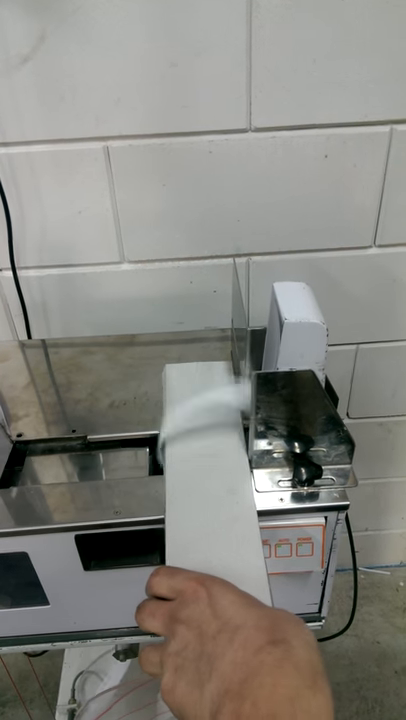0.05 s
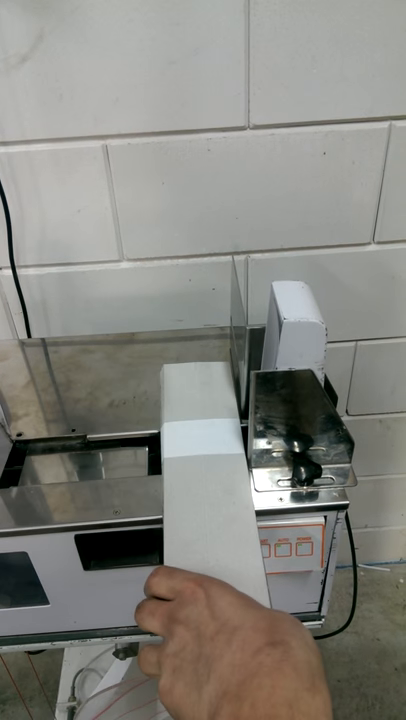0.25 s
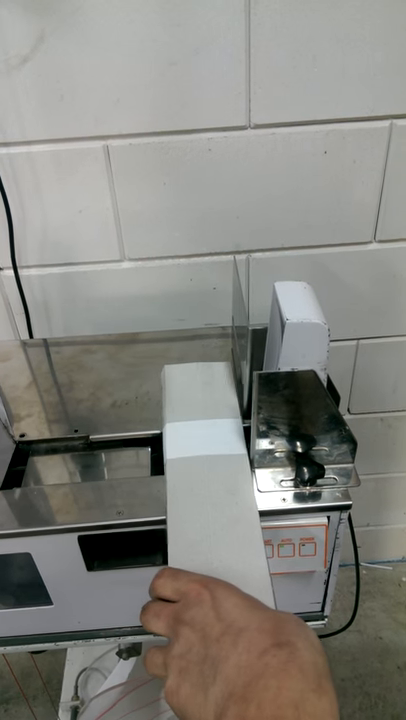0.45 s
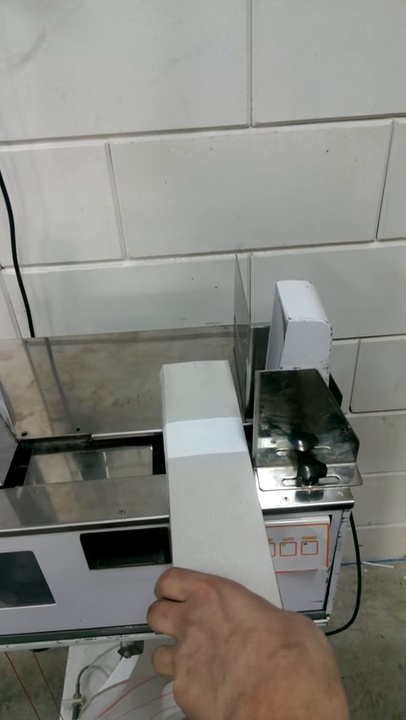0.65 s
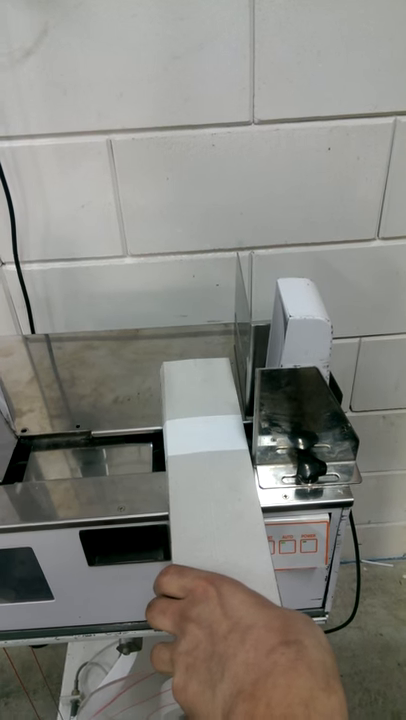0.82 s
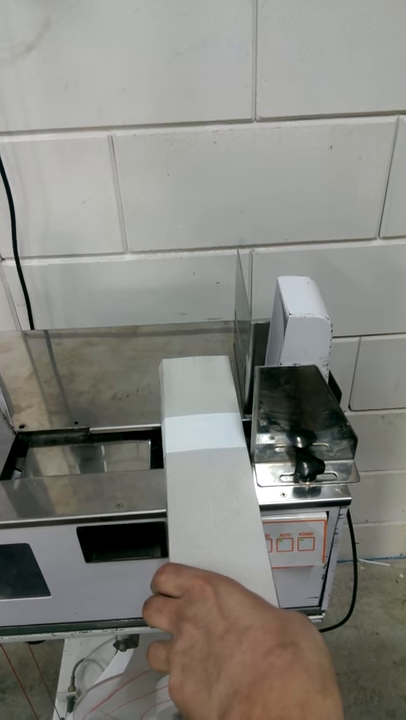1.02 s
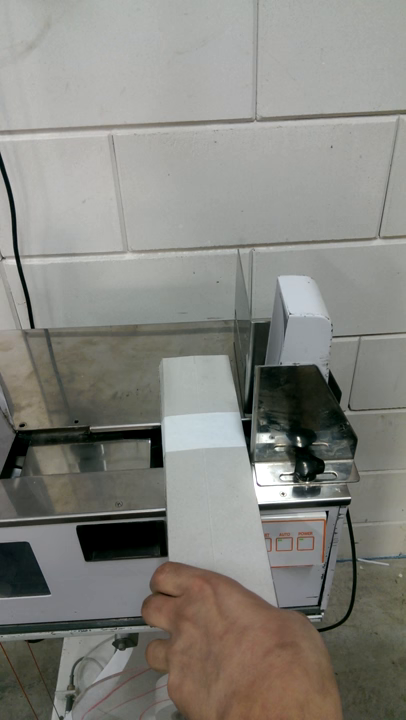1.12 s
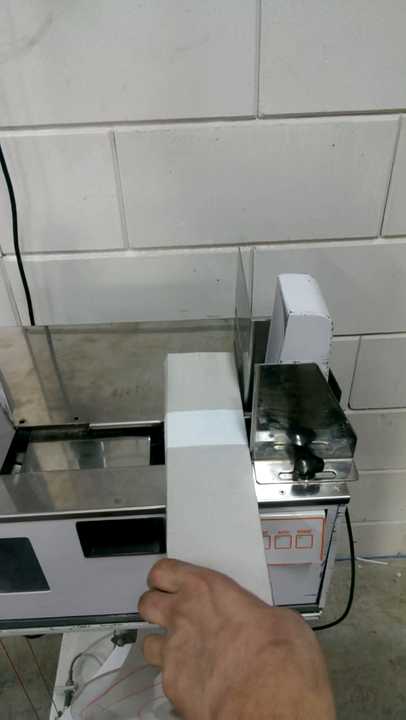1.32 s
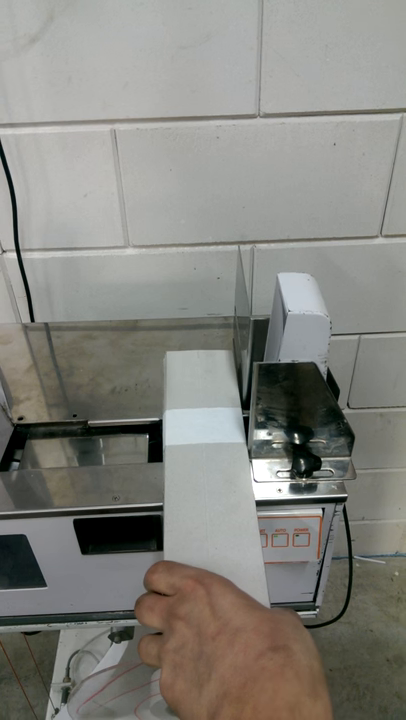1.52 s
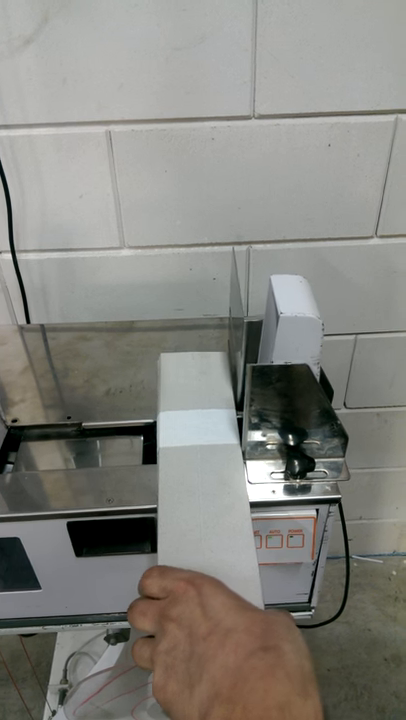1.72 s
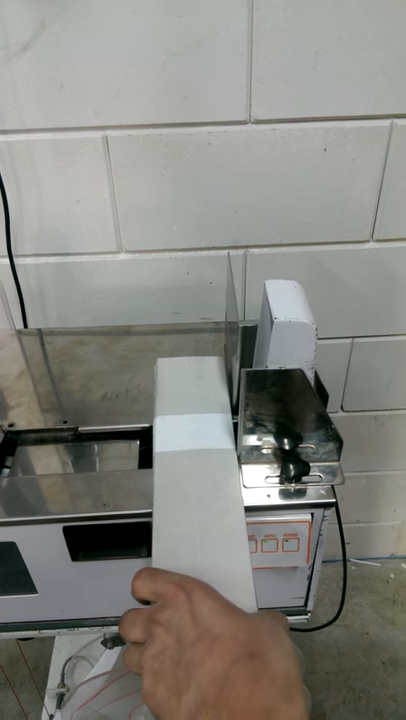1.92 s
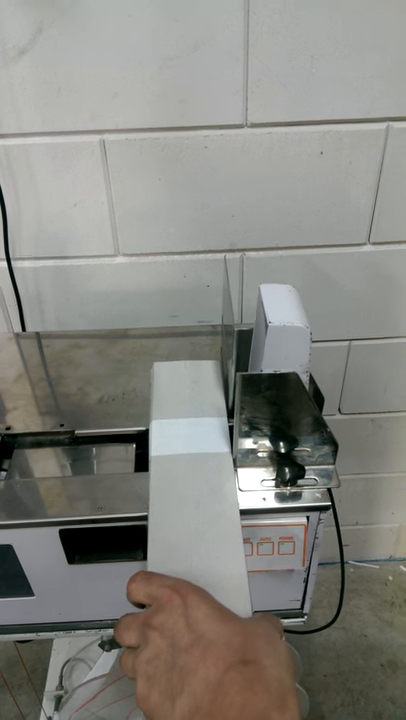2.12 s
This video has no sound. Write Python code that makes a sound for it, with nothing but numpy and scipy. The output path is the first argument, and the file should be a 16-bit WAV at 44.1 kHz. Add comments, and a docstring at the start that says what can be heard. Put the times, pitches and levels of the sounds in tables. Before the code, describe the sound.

A small banding machine whirs and whines close by as a paper band hisses and slaps around a box at 0.25 seconds. Rollers buzz from 0.3 to 0.9 seconds, with a sharp click near 0.7. Clamps knock at 1.1 and 1.25 seconds, and the cutter clacks loudest near 1.5. The motor dies away by 1.8 seconds, leaving faint metal ringing over a low hum in a hard-walled room.

```python
"""A tabletop banding machine wraps a paper band round a box, close by in a hard-walled room.
First the drive whirs and the feed motor whines while the band slides in and whips shut on the box.
Then rollers buzz as they pull it tight, the frame drones, and the rollers labour to a stop.
Next the clamps knock and the cutter strikes. Last, the drive shuts off,
leaving the ring of the frame over a low room hum."""
import sys
import numpy as np
from scipy import signal
from scipy.fft import rfft, irfft
from scipy.io import wavfile

SR = 44100
rng = np.random.default_rng(int(sys.argv[2]) if len(sys.argv) > 2 else 0)


def master_out(mix):
    """Clip the mix to full scale and print it as 16-bit PCM to the path in sys.argv[1]."""
    frames = np.transpose(np.atleast_2d(mix))
    ceiling = np.clip(frames, -1, 1)
    pcm = np.round(ceiling * 32767).astype(np.int16)
    wavfile.write(sys.argv[1], SR, pcm)


N = 94815
TIME = np.arange(N) / SR
FREQS = np.arange(N // 2 + 1) * SR / N


def undb(db):
    """Turn decibels into a gain."""
    return 10 ** (np.asarray(db) / 20)

def curve(rows):
    """Join (seconds, value) rows with straight lines."""
    return np.interp(TIME, *np.array(rows).T)

def fader(rows):
    """A gain that follows (seconds, dB) rows, silent after the last."""
    return undb(curve(rows)) * (TIME <= rows[-1][0])

def strike(start, rise, fade):
    """A straight rise, then a fall of 60 dB every `fade` seconds: the fade time."""
    age = TIME - start
    return np.clip(age / rise, 0, 1) * np.exp(-np.log(1000) * np.maximum(age - rise, 0) / fade)

def at_hz(hz, rows, column=1):
    """Look up a table by frequency, on a log scale."""
    rows = np.array(rows)
    return np.interp(np.log(hz + 1), np.log(rows[:, 0]), rows[:, column])

def unit(x):
    """Scale to an average (rms) level of 1."""
    return x / np.sqrt(np.mean(x ** 2))

def shaped(x, gain):
    """Apply a gain to each frequency, then scale to level 1."""
    return unit(irfft(rfft(x) * gain, N))

def noise():
    """Separate white noise for left and right."""
    return rng.standard_normal((2, N))

def wobble(hz):
    """A random wander of size 1, mostly slower than hz."""
    return shaped(rng.standard_normal(N), 1 / (1 + (FREQS / hz) ** 4))

def wavering_phase(pitch, jitter, hz):
    """The phase of a pitch that strays by the fraction `jitter`, mostly slower than hz."""
    return 2 * np.pi * np.cumsum(pitch * (1 + jitter * wobble(hz))) / SR

def colour(rows):
    """Gains from (Hz, dB) rows, falling steeply below the first."""
    return undb(at_hz(FREQS, rows)) * np.minimum(FREQS / rows[0][0], 1) ** 2

def peak(hz, width):
    """A bump of height 1 around one frequency."""
    return 1 / (1 + ((FREQS - hz) / width * 2) ** 2)

def resonances(rows):
    """Gains from (Hz, width, dB) peaks."""
    return sum(undb(db) / np.sqrt(width) * peak(hz, width) for hz, width, db in rows)

# The centres of six frequency ranges, bass to treble, in Hz.
RANGE_HZ = (250, 750, 1550, 2800, 5500, 12000)
def frequency_range(index, low_cut_hz=176):
    """Gains for one of the overlapping ranges; a small machine gives little deep bass."""
    share = np.interp(np.log(FREQS + 1), np.log(RANGE_HZ), np.arange(len(RANGE_HZ)) == index)
    return np.sqrt(share) / (1 + (low_cut_hz / (FREQS + 1)) ** 6)

# Each row: frequency in Hz, how alike the sides are (0-1), left over right in dB, left lead in radians.
STEREO = [(100, 0.88, 2.5, 0.17), (255, 0.94, 5, 0), (735, 0.28, 2, -0.37), (1700, 0, -0.5, -1.65),
          (3220, 0.38, -5.5, -0.55), (8150, 0.74, -8, -2), (11800, 0.9, -14, -1.5)]
def sides(hz):
    """The machine's gain and phase shift on the left and on the right."""
    half = undb(at_hz(hz, STEREO, column=2) / 2) * np.exp(.5j * at_hz(hz, STEREO, column=3))
    return np.array([half, 1 / half]).reshape(2, -1)

def stereo(x, gain, placed=True):
    """Filter and blend two signals: alike in the bass and, if placed, with the treble to the right."""
    a, b = rfft(shaped(x, gain))
    alike = np.clip(at_hz(FREQS, STEREO), 0, 1)
    mid, side = a * np.sqrt((1 + alike) / 2), b * np.sqrt((1 - alike) / 2)
    return irfft(np.array([mid + side, mid - side]) * (sides(FREQS) if placed else 1), N)

def tone(phase, hz):
    """A pure tone near hz, placed between left and right."""
    return np.sqrt(2) * np.imag(sides(hz) * np.exp(1j * phase))


# The room's air. Each row: frequency in Hz, relative level in dB.
AIR_COLOUR = [(25, -6), (140, -14), (270, 1.5), (400, -8.5), (600, -3), (1200, -12), (2300, -10),
              (3300, -26), (6000, -36), (15500, -42.5)]
# The room's hum. Each row: frequency in Hz, width in Hz, relative level in dB.
HUM_PEAKS = [(263.2, 11, -6.5), (1523, 97, -7)]
def ambience(air_db=-49.5, hum_db=-53.5, lean_left_db=3.5):
    """The steady air and low hum of the room."""
    air = undb(air_db) * stereo(noise(), colour(AIR_COLOUR), placed=False)
    pan = undb(lean_left_db * np.array([[.5], [-.5]]))
    return air * pan + undb(hum_db) * stereo(noise(), resonances(HUM_PEAKS))

# The echo's fade time in seconds for each of the six ranges.
ECHO_FADES = (0.85, 0.85, 1, 1, 0.72, 0.5)
def wall_echo(x, level_db=-10.5):
    """Hard walls throw back a wash of sound that dies sooner in the treble."""
    tail = 0
    for k, fade in enumerate(ECHO_FADES):
        wash = irfft(rfft(noise()) * frequency_range(k), N)
        tail = tail + wash * strike(start=0.0055, rise=0.0031, fade=fade)
    tail = tail / np.sqrt(np.sum(tail ** 2) / 2)
    echo = undb(level_db) * signal.fftconvolve(x, tail, axes=1)[:, :N]
    return stereo(echo, 1, placed=False) * np.sqrt(np.mean(echo ** 2))

# The drive's whir. Each row: frequency in Hz, relative level in dB.
WHIR_COLOUR = [(71, -18), (120, -3.5), (265, -2), (509, -3.5), (598, -48), (995, 0), (1410, -15),
               (2870, -5), (8770, -25.5), (15500, -31.5)]
# The drive's resonances. Each row: frequency in Hz, width in Hz, relative level in dB.
WHINE_PEAKS = [(276, 8.4, -1), (379.3, 10, -7), (1930, 60, 5), (2062, 53, 3), (2850, 58, 8), (3224, 18, 1),
               (3770, 380, 3.5), (5140, 300, -2)]
# How hard the drive works. Each row: time in seconds, level in dB.
DRIVE_EFFORT = [(0, -37.5), (.12, -37), (.3, -35), (.85, -37.5), (1.0, -38.5), (1.22, -37), (1.45, -35.5),
                (1.53, -38), (1.63, -46.5), (1.82, -69)]
# The electric hum. Each row: time in seconds, level in dB.
MAINS_LEVEL = [(0, -74), (.17, -53), (.28, -53.5), (.7, -51.5), (1.0, -58.5), (1.45, -56), (1.6, -79.5)]
def drive(whir_db=-5, whine_db=-6, mains_hz=100):
    """The running drive whirs and whines over the hum of the mains."""
    whir = undb(whir_db) * stereo(noise(), colour(WHIR_COLOUR))
    whine = undb(whine_db) * stereo(noise(), resonances(WHINE_PEAKS))
    hum = tone(2 * np.pi * mains_hz * TIME, mains_hz)
    return (whir + whine) * fader(DRIVE_EFFORT) + hum * fader(MAINS_LEVEL)

# The feed motor's whine. Each row: time in seconds, level in dB.
MOTOR_LEVEL = [(0, -50), (.15, -44.5), (.3, -44), (.85, -50), (1.07, -50.5), (1.15, -70), (1.45, -70)]
def feed_motor(pitch_hz=977.5, flutter_db=2.5):
    """The feed motor's rough whine fades once the band is clamped."""
    phase = wavering_phase(pitch_hz, jitter=0.026, hz=70)
    return fader(MOTOR_LEVEL) * undb(flutter_db * wobble(hz=80.4)) * tone(phase, pitch_hz)

# The sliding band. Each row: time in seconds, level in dB.
SLIDE_LEVEL = [(0, -40.5), (.035, -34), (.085, -46.5), (.11, -40), (.165, -44.5), (.203, -37),
               (.218, -30.5), (.243, -28.5), (.262, -53), (.3, -70)]
# Its rustle. Each row: frequency in Hz, relative level in dB.
SLIDE_COLOUR = [(300, -0.5), (1200, 5), (3000, 4), (5000, 1), (7000, 3), (11500, -1), (15500, -11)]
def band_slide(clicks_per_s=1100, spread_db=8, crackle_db=-1.5):
    """The paper band hisses and crackles as it slides."""
    hits = rng.random(N) < clicks_per_s / SR
    clicks = hits * undb(spread_db * np.tanh(rng.standard_normal(N))) * np.sign(noise())
    rustle = stereo(noise() + undb(crackle_db) * unit(clicks), colour(SLIDE_COLOUR))
    return rustle * fader(SLIDE_LEVEL)

# The band's flicks. Each row: start in seconds, level in dB, rise and fade times in seconds.
FLICKS = [(0.21, -31.5, 0.00067, 0.034), (.2205, -31.5, 0.00074, 0.036), (.678, -37, 0.00065, 0.043),
          (0.695, -29.5, 0.0076, 0.1), (1.388, -33, 0.0081, 0.097)]
# Their brightness. Each row: frequency in Hz, relative level in dB.
FLICK_COLOUR = [(1500, -8), (4000, 6.5), (8000, -0.5), (11500, -1), (15500, -15)]
def band_flicks():
    """Each flick of the band is a short, sharp burst of hiss."""
    bursts = sum(undb(db) * strike(start, rise, fade) for start, db, rise, fade in FLICKS)
    return stereo(noise(), colour(FLICK_COLOUR)) * bursts

def band_whip(start_s=.243, top_hz=3200, fall_s=.018, level_db=-27):
    """The loop of band slaps shut on the box: a rough chirp that falls quickly."""
    pitch = top_hz * np.exp(-np.maximum(TIME - start_s, 0) / fall_s)
    phase = wavering_phase(pitch, jitter=0.072, hz=900)
    return undb(level_db) * strike(start_s, rise=0.0015, fade=0.043) * tone(phase, top_hz)

# The rollers' note. Each row: time in seconds, pitch in Hz.
ROLLER_PITCH = [(.28, 248.7), (.58, 246), (.68, 253.9), (.8, 255.4)]
# How hard they pull. Each row: time in seconds, level in dB.
ROLLER_LOAD = [(.28, -65), (.315, -35), (.4, -36), (.62, -36), (.74, -35), (.83, -34), (.87, -44),
               (.93, -93)]
# The tones in their buzz. Each row: multiple of the pitch, relative level in dB.
BUZZ_TONES = [(1, -7), (2, -8), (3, -3.5), (4, -3), (5, -12), (6, -10.5), (7, -14), (8, -7)]
# Their rasp. Each row: frequency in Hz, relative level in dB.
RASP_COLOUR = [(150, -12), (300, -4.5), (600, -4.5), (950, 0.5), (1350, -3), (2100, -6), (3000, -4.5),
               (4500, -12), (8000, -21), (15500, -37.5)]
DRONE_ON_S, DRONE_FULL_S, DRONE_OFF_S, DRONE_FADE_S = 0.62, 0.7, 0.846, 0.38
def rollers(rasp_db=3.5, flutter_db=2.57, drone_db=-30, buzz_dip_db=-2.5):
    """Rollers rasp and buzz on the band; as it comes tight, the frame drones at their pitch."""
    pitch, load = curve(ROLLER_PITCH), fader(ROLLER_LOAD)
    phase = wavering_phase(pitch, jitter=0.00597, hz=40)
    buzz = sum(undb(db + flutter_db * wobble(hz=82)) * tone(multiple * phase, multiple * pitch.mean())
               for multiple, db in BUZZ_TONES)
    pulsing = 1 + 0.059 * np.cos(phase)
    rasp = stereo(noise() * pulsing * undb(1.46 * wobble(hz=63)), colour(RASP_COLOUR))
    tight = np.clip((TIME - DRONE_ON_S) / (DRONE_FULL_S - DRONE_ON_S), 0, 1)
    release = np.exp(-np.log(1000) * np.maximum(TIME - DRONE_OFF_S, 0) / DRONE_FADE_S)
    drone = undb(drone_db) * tight * release * tone(phase, pitch.mean())
    tones = buzz * undb(buzz_dip_db * tight) * load + drone
    return undb(rasp_db) * rasp * load, tones

# Knocks of band, clamps and cutter. Each row: start in seconds, six levels in dB (one per range),
# how hard casing, frame and blade ring in dB, base rise time and fade time at 1000 Hz in seconds.
KNOCKS = [ (0.242, -31, -34, -29, -34, -35, -50, -51, -41, -62, 0.00076, 0.089),
          (0.6774, -36, -33, -26, -24.5, -26.5, -30.5, -54, -50, -66, 0.00084, 0.12),
          (.685, -33.5, -32, -29.5, -36, -36, -45, -48, -44, -54, 0.00091, 0.14),
          (1.079, -31.5, -28.5, -31, -33.5, -29, -41, -31, -40, -56, 0.00094, 0.12),
          (1.255, -28.5, -24, -24, -27.5, -27, -33, -24.5, -33.5, -43.5, 0.0026, 0.13),
          (1.292, -48, -50, -38, -34.5, -42, -49, -34, -52, -66, .006, 0.14),
          (1.391, -39, -59, -28.5, -45, -57, -63, -55, -66, -64, 0.0062, 0.094),
          (1.4607, -28.5, -19.5, -15, -16, -23.5, -31.5, -30.5, -29.5, -26, 0.00062, 0.086),
          (1.481, -28, -35, -22, -33.5, -43, -47, -38, -57, -37, .003, 0.18)]
# Panel resonances that colour the clatter. Each row: frequency in Hz, width in Hz, boost in dB.
PANEL_PEAKS = [(320, 73, -6), (736, 116, 6), (940, 240, 8.5), (1517, 110, 10), (2650, 1040, 5)]
def knocks(damping=0.28, bass_lag=0.057):
    """Each knock is a dense clatter whose bass comes later and lasts longer."""
    panels = undb(sum(db * peak(hz, width) for hz, width, db in PANEL_PEAKS))
    clatter = 0
    for k, hz in enumerate(RANGE_HZ):
        stretch = (1000 / hz) ** damping
        lag = bass_lag * RANGE_HZ[0] / hz
        blows = sum(undb(levels[k]) * strike(start, rise + lag * fade, stretch * fade)
                    for start, *levels, rise, fade in KNOCKS)
        clatter = clatter + stereo(noise(), frequency_range(k) * panels) * blows
    return clatter

# The notes of the hollow casing, the frame and the blade.
# Each row: pitch in Hz, relative level in dB, fade time in seconds.
CASING_NOTES = [(301.4, -9, 0.18), (659, -7.5, 0.15), (771, -4, 0.055), (850, -13, 0.029)]
FRAME_NOTES = [(168.2, -12, 0.61), (215, -9.5, 0.81), (273.9, -5.5, 0.8), (308.3, -1, 0.23),
               (383.2, -6, 0.3), (654.6, -5, 0.44), (759, 6, 0.068), (1180, -1, 0.14)]
BLADE_NOTES = [(1453, -9, .33), (1546, 14.5, 0.072), (1612, -10, 0.5), (1973, 0.5, 0.13), (2009, -1, 0.1),
               (2315, 0, 0.15), (2514, -18, 1), (2775, -7, 0.24), (2825, 0, 0.11)]
def ring(notes, column, rise_s):
    """Every knock sets a part ringing with a slight rattle, as hard as its column in KNOCKS says."""
    one_ring = sum(undb(db) * strike(0, rise_s, fade) * tone(wavering_phase(hz, .011, hz=39.7), hz)
                   for hz, db, fade in notes)
    ringing = np.zeros((2, N))
    for knock in KNOCKS:
        start = int(knock[0] * SR)
        ringing[:, start:] += undb(knock[column]) * one_ring[:, :N - start]
    return ringing


def scene(metal_to_walls_db=-3.5):
    """The machine and its ringing casing, frame and blade in the room."""
    rasp, roller_tones = rollers()
    casing = ring(CASING_NOTES, column=7, rise_s=0.0049)
    frame = ring(FRAME_NOTES, column=8, rise_s=0.0064)
    blade = ring(BLADE_NOTES, column=9, rise_s=0.0038)
    metal = frame + blade
    machine = drive() + rasp + band_slide() + band_flicks() + band_whip() + knocks() + casing
    echo = wall_echo(machine + undb(metal_to_walls_db) * metal)
    return machine + feed_motor() + roller_tones + metal + echo + ambience()

def record(dry):
    """Cut the treble above 15700 Hz."""
    return signal.sosfilt(signal.ellip(8, .2, 80, 15700, fs=SR, output="sos"), dry)


dry = scene()
out = record(dry)
master_out(out)
```